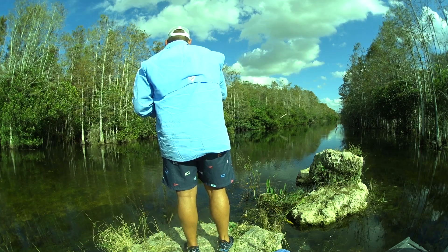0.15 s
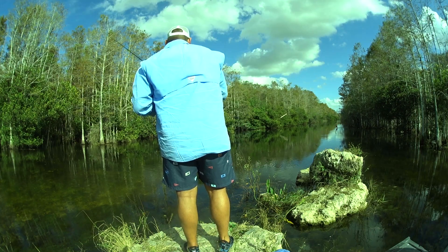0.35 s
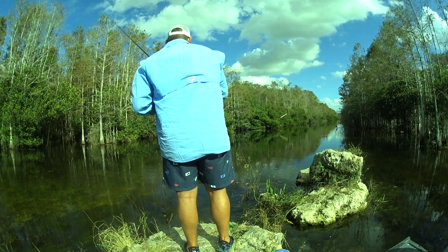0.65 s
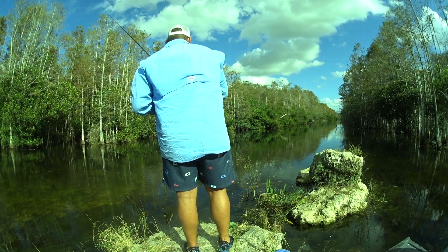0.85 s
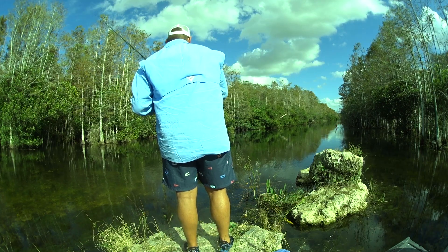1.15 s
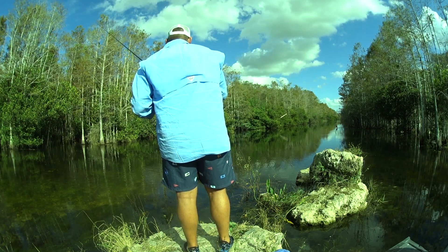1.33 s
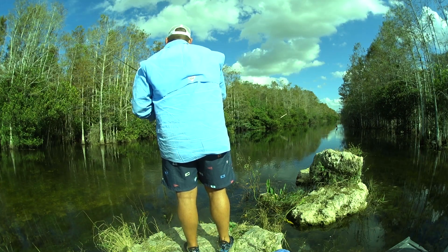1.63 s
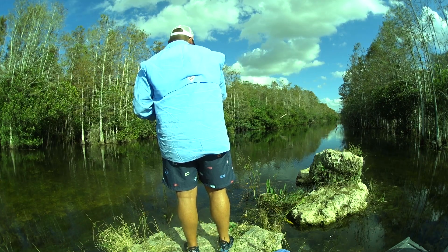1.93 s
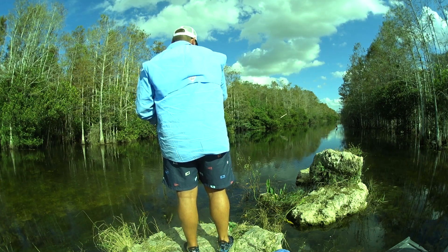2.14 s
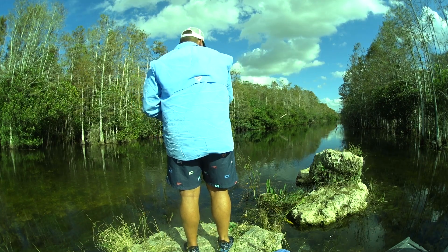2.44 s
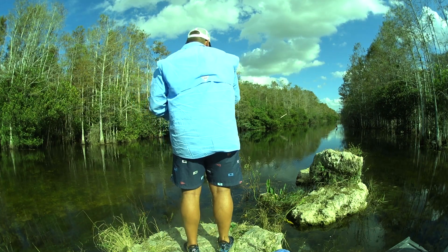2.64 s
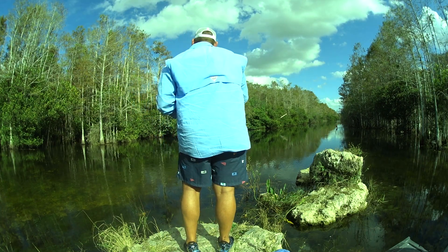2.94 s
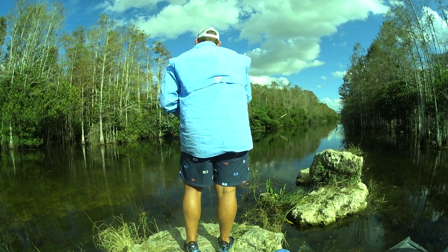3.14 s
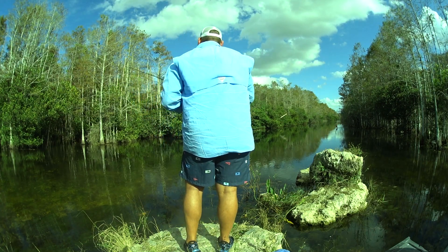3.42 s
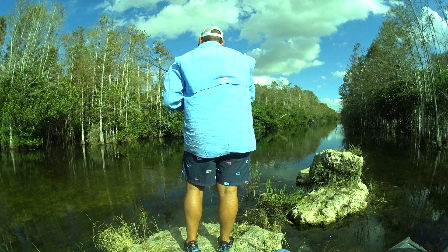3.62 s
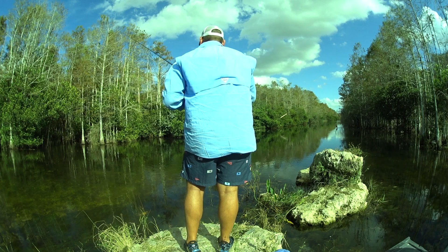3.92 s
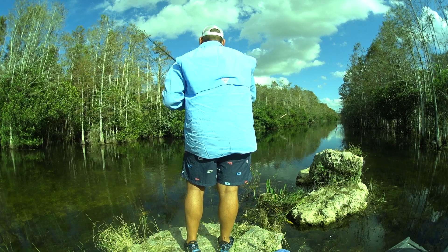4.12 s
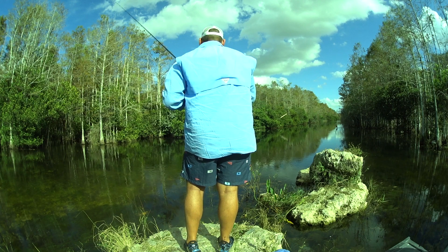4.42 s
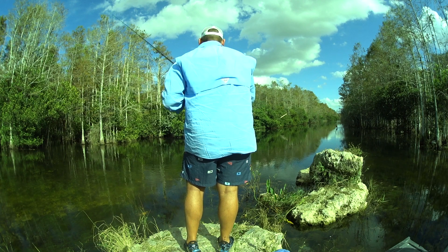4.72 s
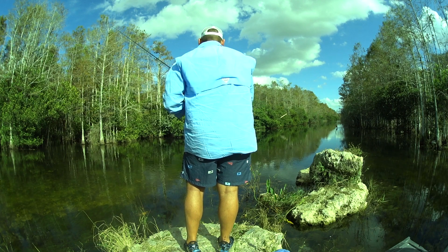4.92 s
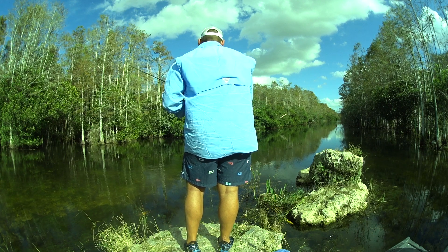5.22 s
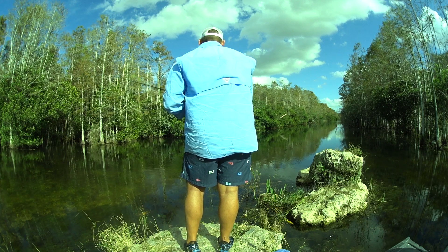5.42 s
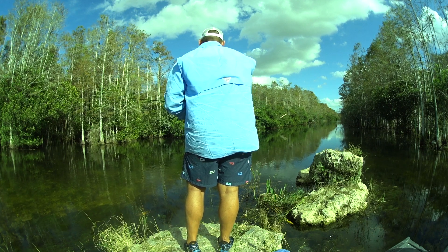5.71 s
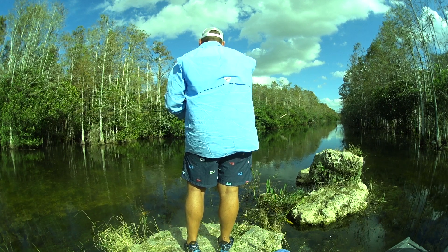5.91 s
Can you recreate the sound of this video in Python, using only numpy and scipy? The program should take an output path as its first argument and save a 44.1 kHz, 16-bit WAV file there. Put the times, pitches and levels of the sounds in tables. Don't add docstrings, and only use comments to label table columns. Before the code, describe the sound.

Outdoors by still, tree-edged water, a large engine drones far away throughout: a low, dense, slightly wavering hum with a raspy edge and a broad rushing roar. It is pulling hardest at the start, sinks in pitch until about 1.5 s, holds until 3.3 s, then sinks again to a lower, steadier drone by 4.7 s; the roar fades from about 1 s. A quiet marsh hush lies beneath. Soft low wind puffs bump the microphone, mostly before 3.3 s. Tiny tackle ticks sit close at 1.1-1.45 s; a sharper cluster with a firm gritty shoe scuff comes at 2.1-2.25 s, trailed by faint grinding and ticks to 3 s, then one dull click at 4.8 s. A small bird's thin, buzzy, downward-flicked chips come at 1.2, 2.25, 3.55, 4.45 and, loudest, 5.75 s, each with a short scattered echo; an echo remnant opens the scene.

```python
import sys
import numpy as np
from scipy import signal
from scipy.fft import rfft, irfft, next_fast_len
from scipy.io import wavfile
from scipy.ndimage import uniform_filter1d

SR = 44100
rng = np.random.default_rng(int(sys.argv[2]) if len(sys.argv) > 2 else 0)


def store_wav(level_fs):
    pcm = np.round(np.clip(np.atleast_2d(level_fs), -1, 1) * 32767)
    wavfile.write(sys.argv[1], SR, pcm.T.astype(np.int16))


def volts_from_decibels(level):
    exponent = np.asarray(level, float) / 20
    return 10 ** exponent


N = 267246
T = np.arange(N) / SR


def evened(x):
    return x / np.sqrt(np.mean(x ** 2) + 1e-20)


def read(points, hz):
    f, value = np.transpose(points)
    return np.interp(np.log(hz + 1), np.log(f + 1), value)


def over_time(rows):
    s, value = np.transpose(rows)
    return np.interp(T, s, value)


def colour(x, gain):
    size = next_fast_len(N + 4096)
    hz = np.fft.rfftfreq(size, 1 / SR)
    return irfft(rfft(x, size) * gain(hz), size)[..., :N]


def noise(spectrum):
    return evened(colour(rng.standard_normal(N), lambda f: volts_from_decibels(read(spectrum, f))))


def drift(hz):
    lowpass = np.exp(-(np.fft.rfftfreq(N, 1 / SR) / hz) ** 2)
    return evened(irfft(rfft(rng.standard_normal(N)) * lowpass, N))


def any_part(modulation):
    return np.roll(modulation, rng.integers(N))


def away_db():
    leave_s, fade_db_per_s, far_db = 1.03, 4.5, -17
    return np.clip(-fade_db_per_s * (T - leave_s), far_db, 0)


# t/s, engine cycles f/Hz
SPEED = [(0, 11.364), (.45, 10.952), (.7, 10.811), (1.2, 10.345), (1.5, 10.11), (1.8, 10.03), (2.2, 10.05),
         (2.45, 9.96), (2.8, 10.005), (3.2, 9.959), (3.45, 9.829), (3.95, 9.513), (4.45, 9.133),
         (4.7, 9.033), (5.2, 8.964), (5.45, 8.9), (5.7, 9.0), (6.06, 8.993)]
COAST_CRUISE_PULL_HZ = [9.05, 9.95, 11.2]
# t/s, level/dB
UNEVEN = [(0, -2), (.6, 0.5), (1, -3.5), (1.6, -6.5), (2.1, -0.5), (2.7, -10), (3.3, 3), (3.7, -1),
          (4.4, -2), (5.4, -3.5), (6.06, 1.5)]
# order of the engine cycle, level/dB coasting, cruising, pulling
LOW_ORDERS = [(3, -70, -66, -58.5), (4, -62, -63, -65.5), (5, -70.5, -65.5, -64.5), (6, -49, -42.5, -37),
              (7, -58.5, -58.5, -60.5), (8, -54, -52.5, -48), (9, -35.5, -43, -51.5),
              (10, -39.5, -42, -37.5), (11, -49.5, -63, -44.5), (12, -35.5, -28.5, -43),
              (13, -46, -64.5, -72), (14, -48, -54, -47), (15, -56.5, -46.5, -47), (16, -51.5, -42, -45.5),
              (17, -55.5, -66, -59), (18, -52, -38.5, -30.5), (19, -45, -64.5, -58.5),
              (20, -52.5, -51.5, -51), (21, -35.5, -45, -47), (22, -60, -60, -63.5),
              (23, -70.5, -58.5, -73.5), (24, -61.5, -52.5, -58), (25, -67, -69, -70.5),
              (26, -60, -79.5, -62.5), (27, -64.5, -73.5, -65), (28, -74, -62.5, -70),
              (29, -61, -72, -57.5)]
FIRING = [(0, 0), (-1.2, .42), (-4.5, .33)]
SLOW_LAG = [1.6, 1, .45]
# order of the engine cycle, level/dB close by
RASP_ORDERS = [(30, -56.5), (40, -58.5), (50, -58.5), (60, -53), (61, -62), (70, -56), (71, -58),
               (80, -55.5), (81, -60), (90, -58), (110, -59), (140, -63.5), (150, -63)]
# f/Hz, level/dB per Hz
RUMBLE = [(20, -51.5), (45, -26.5), (70, -4.5), (105, 14), (145, 0), (215, 12), (245, -9), (290, -29),
          (600, -110)]


def engine():
    waver_db, rasp_waver_db, blur = 2., 5., .01
    cycle_hz, uneven_db = over_time(SPEED), over_time(UNEVEN)
    turn = 2 * np.pi * np.cumsum(cycle_hz) / SR
    shake, flutter = drift(hz=4.), drift(hz=14.)
    out = np.zeros(N)

    for order, *state_db in LOW_ORDERS:
        order = round(order)
        swell, wobble = any_part(shake), any_part(shake)
        level_db = np.interp(cycle_hz, COAST_CRUISE_PULL_HZ, state_db)
        if order % 6:
            steadier = .6 if order in (10, 21) else 1
            level_db = level_db + waver_db * swell * steadier
            if order % 2 or order == 10:
                level_db = level_db + uneven_db
        start, step = FIRING[2 if order % 2 else min(order % 6, 1)]
        late = (order - 6) * (order - 12) / 6 ** 2
        if order % 3 == 0:
            late = late * np.interp(cycle_hz, COAST_CRUISE_PULL_HZ, SLOW_LAG)
        phase = order * turn + start + step * order - late + blur * order * wobble
        out += np.sqrt(2) * volts_from_decibels(level_db) * np.cos(phase)

    pipe_hz, pipe_width_hz, pipe_db = 723, 23, 7
    for order, db in RASP_ORDERS:
        order = round(order)
        swell, wobble = any_part(flutter), any_part(shake + 1.56 * flutter)
        pipe = pipe_db * np.exp(-((order * cycle_hz - pipe_hz) / pipe_width_hz) ** 2)
        level_db = db + 0.69 * away_db() + pipe + rasp_waver_db * swell
        phase = order * turn + 2 * np.pi * rng.random() + blur * min(order, 70) * wobble
        out += volts_from_decibels(level_db) * np.cos(phase)

    rumble_db = -45.5 + 3.0 + 3.0 * (cycle_hz - 10).clip(0)
    return out + volts_from_decibels(rumble_db) * noise(RUMBLE)


# f/Hz, correlation
SAME = [(1400, .985), (2200, .86), (3500, .64), (6000, .55), (8000, .55), (11000, .7)]
# f/Hz, lead/rad
LEAD = [(10, 0.072), (60, 0.67), (120, 0.96), (240, 1.67), (440, 2.04), (950, 2.38), (1900, 2.17),
        (3600, 1.7), (5800, 1.2), (8000, 0.27), (11000, .1)]


def hiss(spectrum, patchy_db):
    frames, hz = N // 256 + 5, np.fft.rfftfreq(1024, 1 / SR)
    a, b, c, d, patches = rng.standard_normal((frames, 513, 5)).T
    patches = evened(uniform_filter1d(uniform_filter1d(patches, 6, 0), 20, 1))
    same = np.clip(read(SAME, hz), 0, 1)[:, None]
    shared = np.sqrt(1 + same) * (a + 1j * b)
    apart = np.sqrt(1 - same) * (c + 1j * d)
    gain = volts_from_decibels(read(spectrum, hz)[:, None] + patchy_db * patches)
    z = np.array([shared + apart, shared - apart]) * gain
    flat = evened(signal.istft(z, nperseg=1024, noverlap=768)[1][:, :N])
    return colour(flat, lambda f: 1 / np.cos(read(LEAD, f) / 2))


# f/Hz, level/dB per Hz
ROAR = [(200, -28), (290, 0), (400, -5), (550, -10), (750, -1), (1030, -5), (1300, -6), (1480, -6.5),
        (1700, -9), (1830, -13.5), (3000, -28), (4500, -34.5), (7000, -67.5)]


def roar():
    level_db = -48.5 + away_db() + 0.27 * drift(hz=6.2)
    return volts_from_decibels(level_db) * hiss(ROAR, patchy_db=1.)


# f/Hz, level/dB per Hz
MARSH = [(200, -35.5), (270, -2), (450, -2.5), (740, -4.5), (1170, -8), (2000, -16), (3500, -21.5),
         (6300, -28), (7200, -34.5), (8400, -33), (9200, -28.5), (10000, -28.5), (10250, -36),
         (11000, -34.5)]


def marsh():
    return volts_from_decibels(-56.5) * hiss(MARSH, patchy_db=1.05)


# f/Hz, level/dB per Hz
WIND = [(8, -25), (20, -4), (35, 0), (48, -3), (62, -24), (100, -55), (250, -130)]
# t/s, peak level/dB, half length/s
GUSTS = [(0.015, -46.5, 0.062), (0.297, -44.5, 0.073), (0.464, -40.5, .05), (0.923, -48, .05),
         (1.751, -53, 0.054), (1.963, -45.5, 0.1), (2.129, -40, 0.036), (2.25, -40.5, 0.069),
         (2.442, -49, 0.048), (2.621, -47, 0.049), (2.853, -41, 0.067), (3.2, -43.5, .05),
         (3.696, -55.5, .12), (4.044, -55, 0.17), (4.416, -65, 0.066), (4.643, -57.5, 0.045),
         (4.813, -54.5, .04), (4.95, -51, 0.037), (5.32, -52.5, .08), (5.497, -62, 0.046),
         (5.7, -66.5, 0.046), (5.94, -58, 0.053)]


def wind():
    calm = volts_from_decibels(-68)
    puffs = sum(volts_from_decibels(db) * np.exp(-((T - s) / half) ** 2) for s, db, half in GUSTS)
    return (calm + puffs) * noise(WIND)


# t/s, level/dB, first f/Hz, last f/Hz, f/Hz reached by the closing flick
CHIPS = [
    (-.03, -56.5, 6550, 6100, 5200),
    (1.19, -57.5, 6880, 6650, 5200),
    (2.251, -56, 6370, 6300, 6000),
    (3.551, -55.5, 5990, 6120, 4670),
    (4.463, -59, 6950, 6370, 5700),
    (5.752, -52.5, 5860, 5790, 4200),
    (6.025, -77, 7000, 7000, 6800),
]


def bird():
    length_s, trill_hz, trill_depth_hz, upper_ratio = .021, 290., 300., 1.15
    echo_db, echo_t60_s = -.5, .75
    early = SR // 10
    dry, t = np.zeros(N + 2 * early), np.arange(0, length_s, 1 / SR)
    shape = np.interp(t / length_s, [0, .2, .4, .6, .7, .9, 1], [0, .4, 1, 1, .55, .35, 0])
    for s, db, first_hz, last_hz, flick_hz in CHIPS:
        hz = np.interp(t / length_s, [0, .62, .9], [first_hz, last_hz, flick_hz])
        burr = np.clip(.62 + .1 * (db + 58.0), .2, 1)
        trill = burr * np.sin(2 * np.pi * (trill_hz * t + rng.random()))
        turn = 2 * np.pi * np.cumsum(hz + trill_depth_hz * trill) / SR
        voice = np.sin(turn) + 0.22 * burr ** 2 * np.sin(upper_ratio * turn)
        voice = voice * (1 + 0.41 * trill)
        at = early + round(s * SR)
        dry[at:at + len(t)] += np.sqrt(2) * volts_from_decibels(db) * voice * shape

    t = np.arange(SR // 4) / SR
    tree_line = np.interp(t, [0, .012, .1, .21], [0, 1, 1, 0])
    fade = volts_from_decibels(-60 * t / echo_t60_s) * tree_line
    taps = rng.standard_normal(len(t)) * (rng.random(len(t)) < .05) * fade
    echo = signal.fftconvolve(dry, taps / np.linalg.norm(taps))[:len(dry)]
    return (dry + volts_from_decibels(echo_db) * echo)[early:early + N]


def resonate(x, hz, width):
    q = max(hz / width, .6)
    return signal.lfilter(*signal.iirpeak(np.clip(hz, 50, 11000), q, SR), x)


# t/s, peak level/dB, ring f/Hz, ring width f/Hz, bright snap level/dB re the ring
TICKS = [(1.088, -66, 4000, 1500, -22), (1.138, -51, 3400, 700, -25), (1.137, -56, 5340, 600, -24),
         (1.146, -59, 5400, 700, -23), (1.206, -53.5, 5540, 700, -25), (1.232, -48, 2730, 400, -30),
         (1.4505, -54.5, 9100, 3940, -5), (1.45, -53, 3500, 1500, -21), (2.088, -38, 2140, 800, -20),
         (2.094, -48, 4600, 1500, -15), (2.104, -59, 8500, 2500, -2), (2.098, -39, 2250, 500, -30),
         (2.113, -39, 2210, 500, -30), (2.119, -50, 2370, 600, -35), (2.2276, -44.5, 4230, 350, -31),
         (2.228, -38, 3000, 2400, -24), (4.807, -47.5, 2100, 900, -36), (2.385, -59, 8920, 900, -16),
         (2.398, -69.5, 8850, 915, -22), (2.5583, -54, 4200, 500, -21), (2.664, -59, 5060, 500, -32),
         (2.905, -63.5, 9600, 2480, -9), (3.054, -66, 9270, 3000, 2), (4.806, -47.5, 3000, 1100, -30)]


def ticks():
    out, t = np.zeros(N + 1000), np.arange(600) / SR
    envelope = np.exp(-t / .0022) * np.minimum(t / .0006, 1)
    bursts = rng.standard_normal((len(TICKS), 600)) * envelope
    snap = signal.butter(2, 5000, "high", fs=SR)
    for burst, (s, db, hz, width, snap_db) in zip(bursts, TICKS):
        ring = resonate(resonate(burst, hz, width), hz, width)
        bright = signal.lfilter(*snap, burst)
        tick = ring / abs(ring).max() + volts_from_decibels(snap_db) * bright / abs(bright).max()
        out[round(s * SR):][:600] += volts_from_decibels(db) * tick
    return out[:N]


# f/Hz, level/dB
GRIT = [(400, -14), (1500, -0.5), (2300, 4), (3000, -3.5), (4700, -5), (5800, -13.5), (7500, -26),
        (8600, -20.5), (11000, -25)]
# t/s, peak level/dB, decay t60/s
SCUFFS = [
    (2.078, -45, 0.47),
    (2.135, -62.5, .8),
    (2.222, -58, 3.7),
    (2.55, -67, 1.2),
]


def scuff():
    grains_per_s, spread_db, rise_s = 5000, 2., 0.013
    sizes = volts_from_decibels(spread_db * np.minimum(rng.exponential(1, N), 4)) * rng.standard_normal(N)
    grains = sizes * (rng.random(N) < grains_per_s / SR)
    press = np.zeros(N)
    for s, db, t60 in SCUFFS:
        press += np.clip((T - s) / rise_s, 0, 1) * volts_from_decibels(db - 60 * abs(T - s) / t60)
    return press * evened(colour(grains, lambda f: volts_from_decibels(read(GRIT, f))))


def scene():
    return engine() + roar() + marsh() + wind() + bird() + ticks() + scuff()


def top_cut(x):
    return signal.sosfilt(signal.butter(12, 11090, fs=SR, output="sos"), x)


def record(dry):
    edge_hz = 11040

    def spread(f):
        return np.exp(.5j * np.outer([1, -1], read(LEAD, f))) * (f < edge_hz)

    return top_cut(colour(dry, spread))


dry = scene()
out = record(dry)
store_wav(out)
```